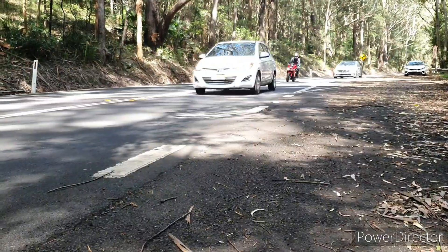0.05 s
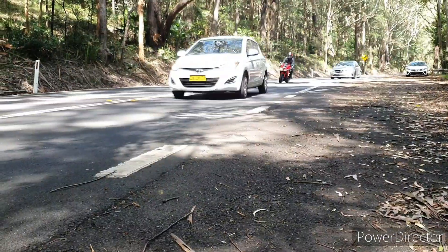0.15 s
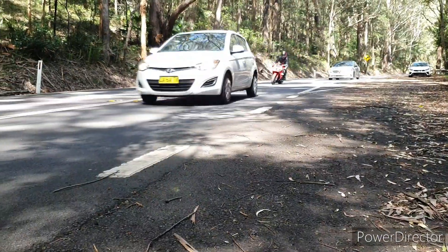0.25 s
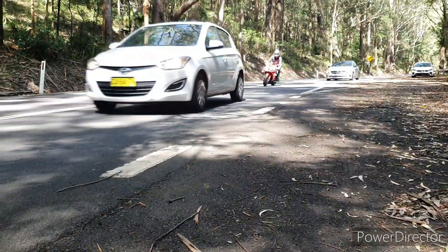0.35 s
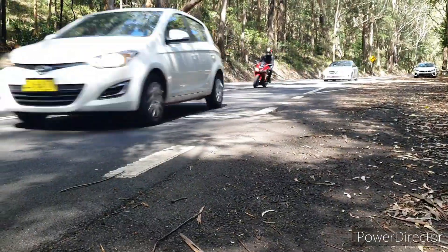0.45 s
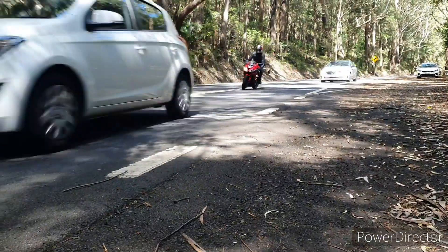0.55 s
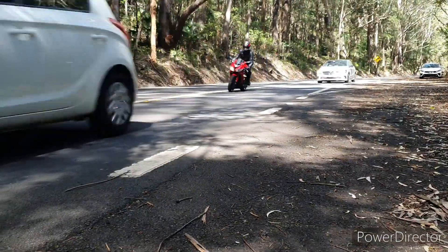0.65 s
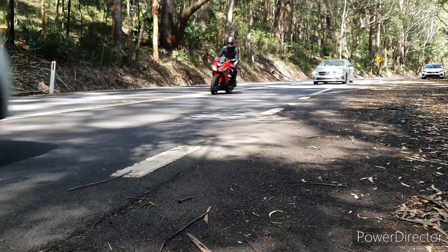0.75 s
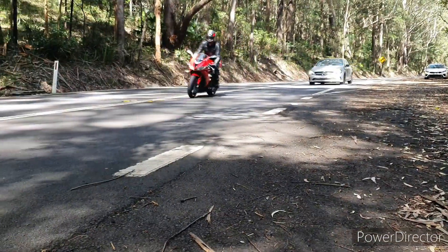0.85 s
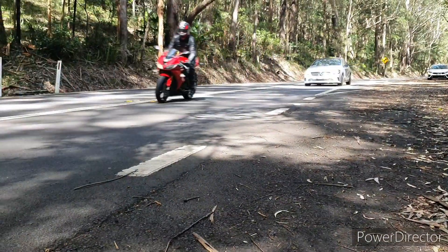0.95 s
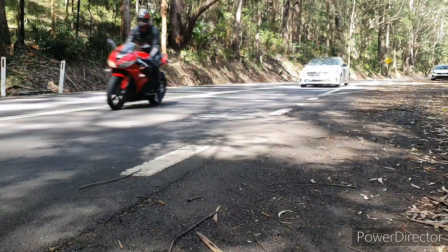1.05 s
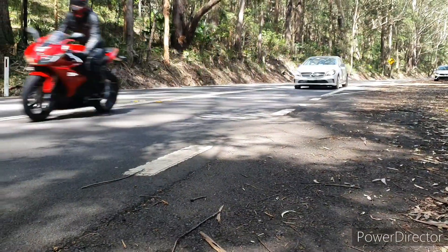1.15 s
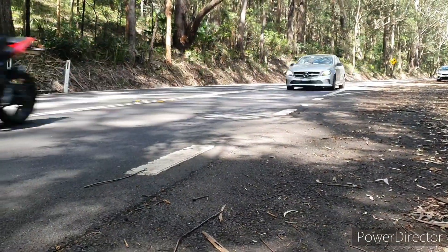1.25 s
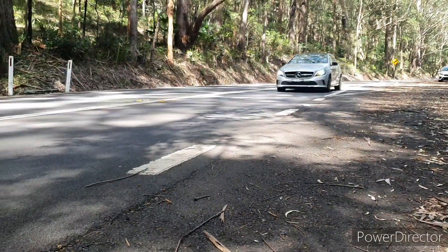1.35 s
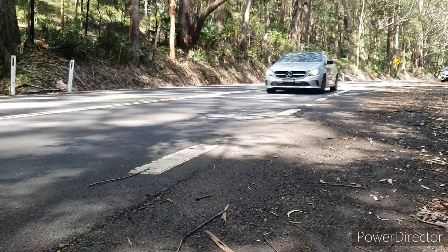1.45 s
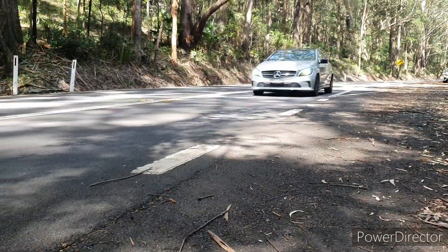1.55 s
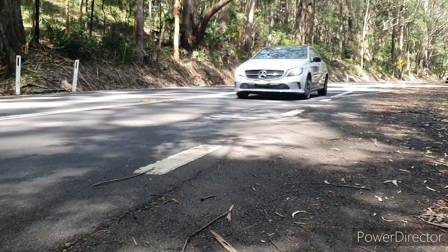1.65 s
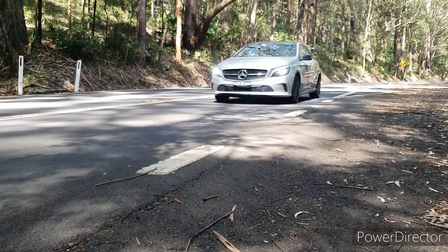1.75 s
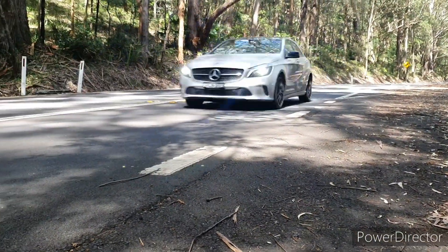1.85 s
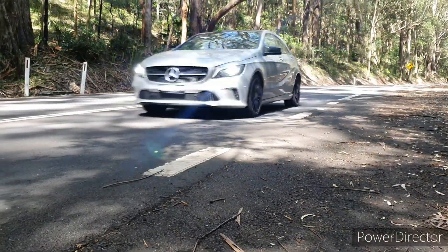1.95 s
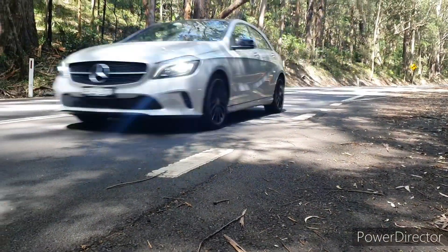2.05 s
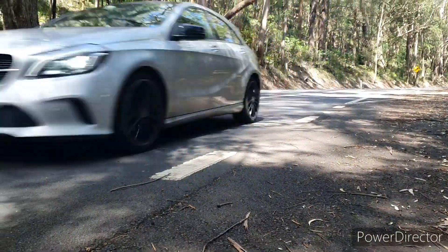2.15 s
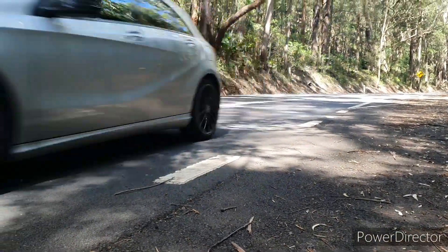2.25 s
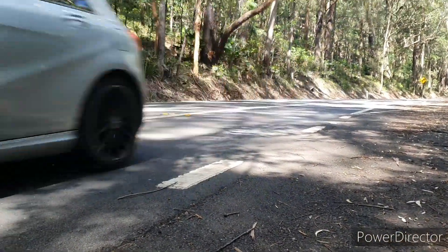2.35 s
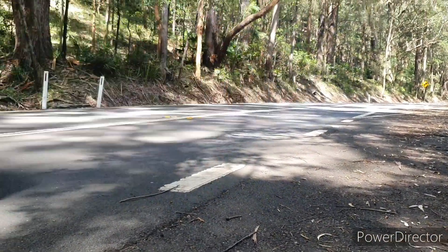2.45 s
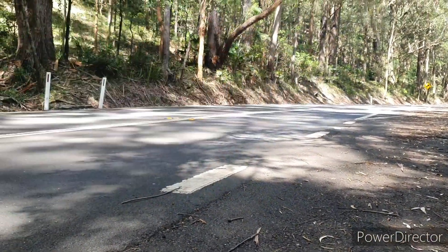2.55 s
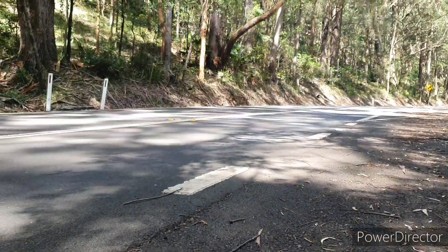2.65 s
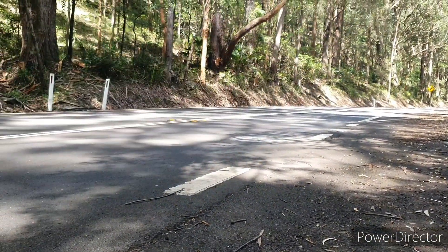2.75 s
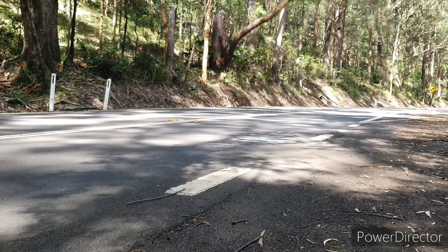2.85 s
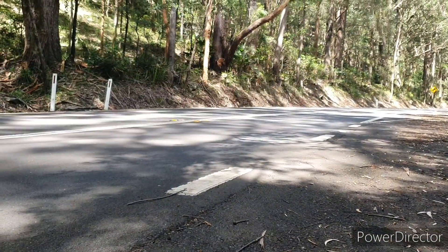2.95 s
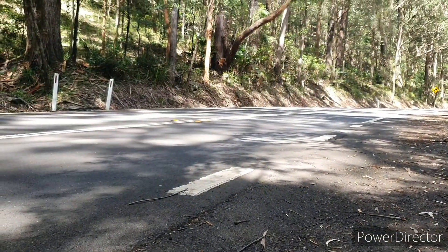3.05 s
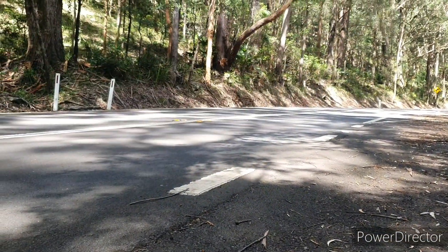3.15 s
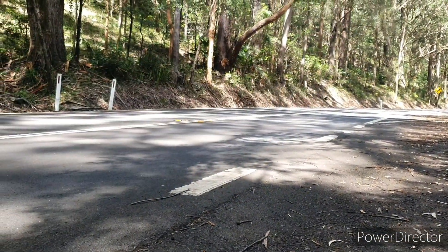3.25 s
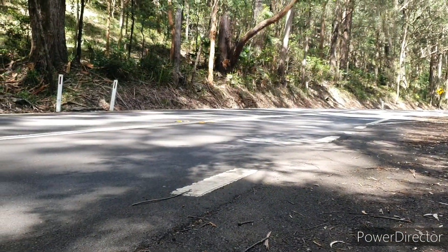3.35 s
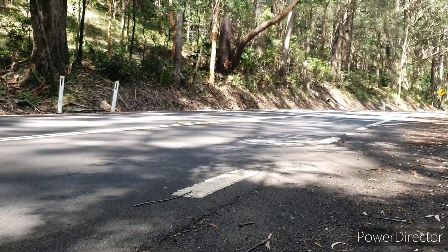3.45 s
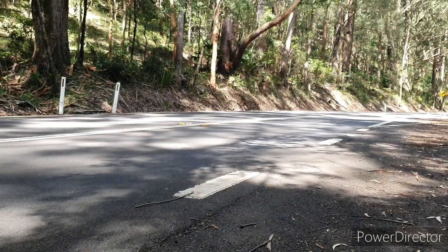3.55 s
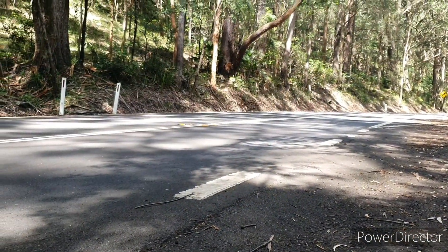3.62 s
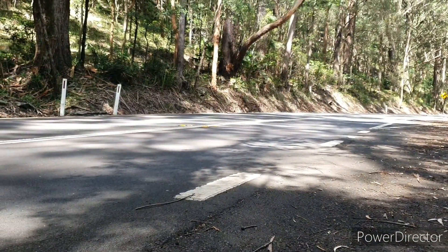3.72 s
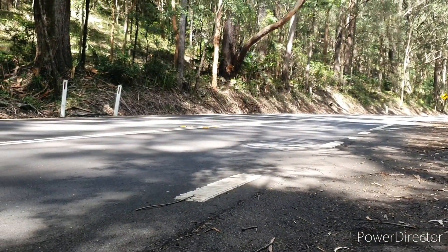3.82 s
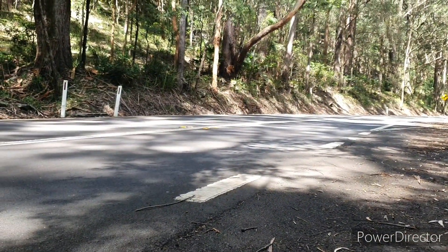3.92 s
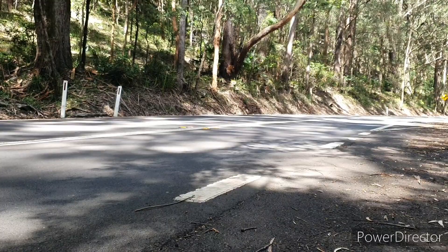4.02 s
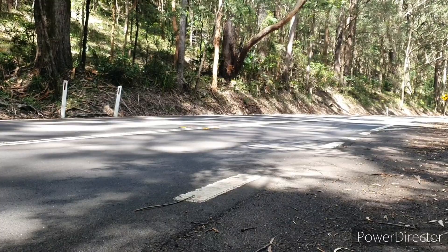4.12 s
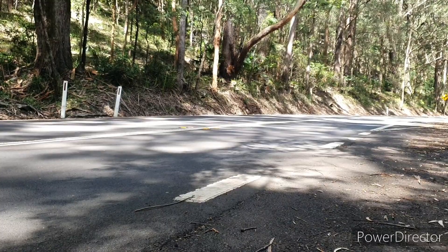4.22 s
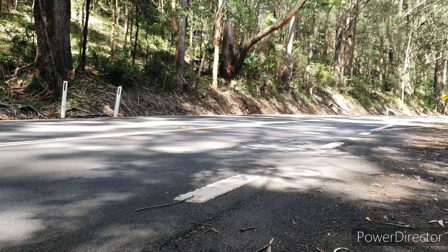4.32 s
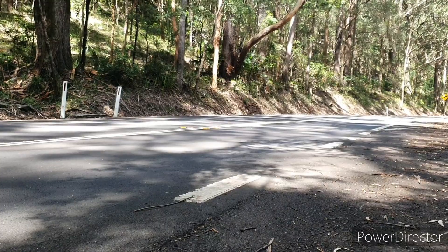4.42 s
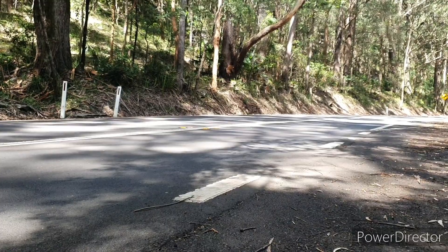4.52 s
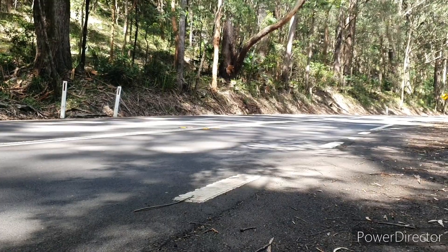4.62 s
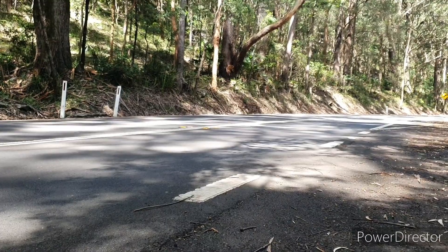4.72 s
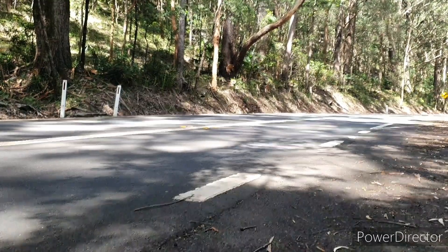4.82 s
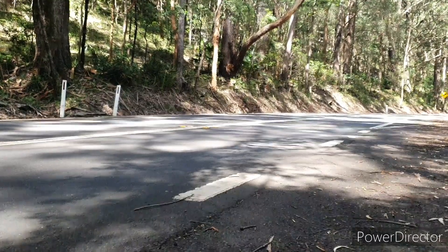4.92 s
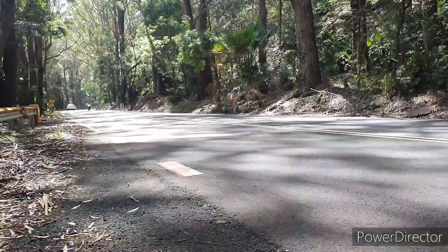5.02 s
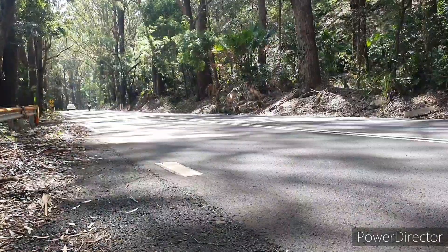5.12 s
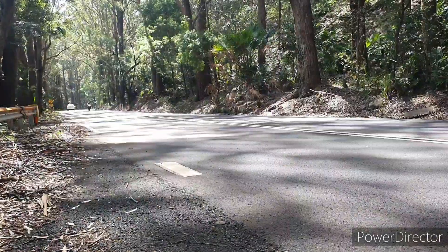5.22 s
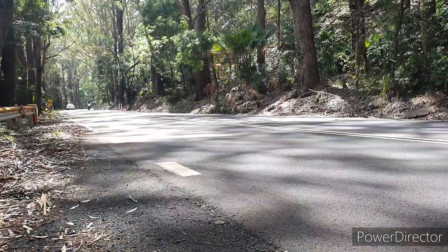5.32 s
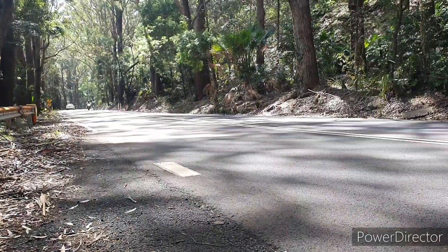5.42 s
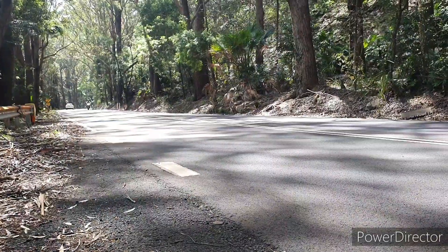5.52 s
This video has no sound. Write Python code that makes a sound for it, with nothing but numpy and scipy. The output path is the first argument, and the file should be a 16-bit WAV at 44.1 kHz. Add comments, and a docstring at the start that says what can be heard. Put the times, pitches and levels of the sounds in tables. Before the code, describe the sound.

A car, a motorcycle and another car sweep past a roadside microphone in quick succession, moving towards the left. The cars are mostly tyre roar and low hum. The motorcycle booms softly and hisses, stumbles with a few pops, then catches and accelerates away with a climbing snarl scattered by the trees. The throttle shuts, the sound cuts out for an instant, and a more distant motorcycle chugs steadily over faint road noise.

```python
"""Motorcycles on a forest road

A three-cylinder motorcycle coasts by between two cars, pops, catches, pulls away, then shuts off.
Firings ring its silencer; chain, intake and tailpipe hiss; tyre treads roar and car engines hum.
Each vehicle sweeps past a microphone pair on the verge, and the trees scatter the sound.
After a short silence, another motorcycle thumps at low revs further off."""
import sys
import numpy as np
from scipy import signal
from scipy.fft import rfft, irfft
from scipy.io import wavfile
from scipy.ndimage import uniform_filter1d, map_coordinates

SR = 44100
rng = np.random.default_rng(int(sys.argv[2]) if len(sys.argv) > 2 else 0)


def generate_wav(sig):
    """Save sig (samples, or channels by samples) to the path in sys.argv[1] as 16-bit PCM at SR."""
    pcm = np.round(np.clip(np.atleast_2d(sig).T, -1, 1) * 32767).astype(np.int16)
    wavfile.write(sys.argv[1], SR, pcm)


N = 246078
T = np.arange(N) / SR

# First car, motorcycle, second car. Each row: passing time in seconds, spread (distance over speed)
# in seconds, tyre gain in dB.
PASSES = [(.76, 0.07, -25), (1.568, 0.17, -39.5), (2.36, 0.058, -33)]
# Tread roar, coming and going. Each row: frequency in Hz, gain in dB.
TYRES_COMING_DB = [(20, -31), (45, -4.5), (80, -1), (200, 0.5), (400, -2.5), (700, -5), (1000, -2.5),
                   (1500, -1.5), (2200, -8.5), (3200, -17), (6000, -33), (15000, -33)]
TYRES_GOING_DB = [(20, -15.5), (45, 0), (80, 10.5), (200, 4), (400, 6), (650, 7.5), (950, 3.5), (1400, -1),
                  (2200, -3.5), (3200, -15.5), (6000, -23.5), (15000, -48)]
# Echo decay. Each row: frequency in Hz, time to fall 60 dB in seconds.
FOREST_T60_S = [(100, 1), (500, 0.82), (2000, 0.69), (12000, 0.15)]
# Each row: start and end in seconds, firing rate before Doppler in Hz, hum in dB, tailpipe swell in dB,
# unsteadiness as a fraction.
CAR_ENGINES = [(0, 1.49, 73.7, -26.5, -19, 0.2), (1.9, 4.95, 58.2, -45, -35.5, .13)]
# Motorcycle engine speed. Each row: time in seconds, base firing rate in Hz.
FIRING_HZ = [(0, 150.5), (.3, 148.5), (.8, 140.5), (1.35, 133.5), (1.6, 126), (1.8, 121), (2.2, 126.5),
             (2.45, 132.5), (2.8, 143), (3.13, 150), (3.85, 168), (4.2, 176), (4.55, 181.5), (4.99, 175)]
# Drive slack jolts the speed. Each row: time in seconds, firing rate jump in Hz, build-up in seconds.
DRIVE_JOLTS = [(1.99, 9.5, 0.057), (3.07, 7, 0.023), (4.7, -8.5, 0.034)]
# Throttle shut. Each row: start and end in seconds, boom in dB, its drift in dB/s, overtones in dB,
# their drift in dB/s, their mid-coast arch in dB.
COASTS = [(0, 1.638, -13, 5, -30, 8.5, 3.5), (4.662, 4.987, -15.5, -11, -22, 7, 0)]
# Silencer with throttle shut, after a lone firing, and under load; then tailpipe snarl.
# Each row: frequency in Hz, gain in dB.
SILENCER_SHUT_DB = [(60, -48.5), (180, -18.5), (255, 5), (350, 1), (385, -8.5), (415, -5), (540, -14),
                    (680, -23), (850, -30.5), (3000, -45), (9000, -82)]
SILENCER_LONE_DB = [(35, -49), (62, -7.5), (90, 9.5), (122, -8.5), (155, -22.5), (183, -4), (212, -1.5),
                    (245, 0), (280, -7.5), (370, -9.5), (490, -12), (600, -25.5), (1200, -52), (9000, -94)]
SILENCER_OPEN_DB = [(40, -43), (125, -9), (140, -11), (150, 0.5), (160, 1.5), (180, -5), (250, 6.5),
                    (300, 1.5), (380, 1.5), (430, 5.5), (545, -4), (595, -2.5), (640, -23.5), (730, -15.5),
                    (930, -41), (1400, -45.5), (2400, -61), (9000, -80)]
SNARL_DB = [(500, -60), (900, -18), (1080, -8), (1200, 2.5), (1260, -3.5), (1400, -18.5), (1650, -9.5),
            (1900, -10), (2300, -29.5), (6000, -73.5)]
# Running gear hiss and tailpipe gas rush. Each row: frequency in Hz, gain in dB.
RASP_COMING_DB = [(900, -16.5), (1500, -8), (2100, 1.5), (2600, -1.5), (3100, -2.5), (3500, -1.5),
                  (4100, -1), (4800, -5), (5600, -7.5), (7200, -14), (10000, -28)]
RASP_GOING_DB = [(700, -7.5), (1100, -1.5), (1450, -3), (1800, 1.5), (2300, -4.5), (2800, -2), (3400, -2.5),
                 (4050, 0), (4800, -6.5), (5600, -6), (7200, -17.5), (10000, -26)]
FIZZ_NEAR_DB = [(4000, -22), (6200, -3.5), (7300, -10.5), (8500, -5), (11000, -5.5), (15500, -7)]
FIZZ_FAR_DB = [(4000, -20.5), (6200, -11), (7300, -3.5), (8500, 1), (10000, -1), (12000, -9),
               (15500, -26.5)]
CHAIN_DB = [(500, -23), (1300, -18.5), (2050, 0.5), (2600, -7.5), (3400, -8), (8000, -29)]
GAS_RUSH_DB = [(700, -31), (1400, -10), (1850, -13.5), (2300, 6.5), (3000, 10.5), (3600, -8), (4400, -10.5),
               (5500, -6), (7200, -12), (12000, -27)]
# Swells on the approach and with the throttle. Each row: time and width in seconds, base boost in dB.
HISS_SURGES = [(1.09, 0.077, 4), (2.02, 0.24, 4), (3.07, 0.28, 5.5), (4.47, 0.34, 5.5)]
# Metallic flares. Each row: time and spread in seconds, centre pitch in Hz, gain in dB.
RING_FLARES = [(0.879, .18, 4333, -36.5), (1.346, 0.032, 4070, -26.5), (1.6, .07, 3914, -30),
               (2.12, 0.065, 3995, -38)]
# Unburnt fuel firing in the pipe. Each row: time in seconds, gain in dB.
FUEL_POPS = [(1.6228, -2), (1.665, -7), (1.89, -4.5)]
# Each entry: one cylinder's strength in dB.
CYLINDERS_DB = [0.07, -1.9, 0.5]
# Two pushes with a lull between. Each row: time in seconds, effort in dB.
THROTTLE_DB = [(1.89, -4.5), (2.2, -1.2), (2.63, -0.1), (2.9, -1.5), (3.24, -6.5), (3.7, -3.5), (4.34, 2),
               (4.66, -1)]
# Dips as the engine catches. Each row: time in seconds, change of effort in dB.
HICCUPS = [(2.021, -2), (2.105, -4.5)]
# Extra snarl in each push. Each row: start and end in seconds, boost in dB.
SNARL_BOOSTS = [(2.26, 3.08, 4), (3.9, 4.236, 4.5)]
# Slow motorcycle's exhaust. Each row: multiple of the cycle rate, gain in dB.
SLOW_ORDERS_DB = [(1, -49), (2, 5.5), (3, -3.5), (4, -5.5), (5, -1.5), (6, -8.5), (7, -12.5), (8, -5.5),
                  (9, -1), (10, -4.5), (11, -19), (12, -19), (13, -9.5), (14, -7.5), (15, -9), (17, -35),
                  (20, -25), (32, -40), (90, -70), (250, -97)]
# Its gas and distant road noise. Each row: frequency in Hz, gain in dB.
SLOW_AIR_DB = [(30, 3), (150, 11), (600, 2), (1000, 1), (1600, -7), (2800, -14.5), (4500, -18), (5800, -18),
               (7300, -31.5), (9500, -33), (10500, -45), (15000, -49)]

FIRST_CAR, MOTORCYCLE, SECOND_CAR = PASSES
GEAR_PASS_S, GEAR_SPREAD_S = 1.467, .19  # chain and intake pass ahead of the tailpipe
OPEN_S, SHUT_S = 1.892, 4.665  # throttle


def amp(db):
    """Decibels to gain."""
    return 10 ** (np.asarray(db) / 20)


def unit_rms(x):
    """Scales to rms 1."""
    return x / np.sqrt(np.mean(x ** 2) + 1e-20)


def steadied(x, samples=2900):
    """Scales to a running rms of 1."""
    power = uniform_filter1d(uniform_filter1d(x ** 2, samples), samples)
    return x / np.sqrt(abs(power) + 1e-12)


def curve(rows):
    """Interpolates (time, value) rows per sample."""
    return np.interp(T, *np.transpose(rows))


def gate(start_s, end_s, fade_samples=200):
    """1 between two times, with linear fades."""
    return uniform_filter1d(((T >= start_s) & (T <= end_s)) * 1., fade_samples)


def swell(at_s, width_s):
    """Gaussian bump of height 1."""
    return np.exp(-((T - at_s) / width_s) ** 2)


def at_hz(rows, hz):
    """Interpolates on a log-frequency axis."""
    row_hz, values = np.transpose(rows)
    return np.interp(np.log(hz + 1), np.log(row_hz + 1), values)


def coloured(x, spectrum_db, size=8192):
    """Minimum-phase filter: each pulse rings after its blow."""
    log_gain = np.log(amp(at_hz(spectrum_db, abs(np.fft.fftfreq(size, 1 / SR)))))
    response = np.fft.ifft(np.exp(signal.hilbert(log_gain).conj())).real[:size // 2]
    return signal.oaconvolve(x, response)[:N]


def noise(spectrum_db):
    """Shaped noise of rms 1."""
    return unit_rms(coloured(rng.standard_normal(N), spectrum_db))


def wander(hz, size=4096):
    """Random drift of rms 1, up to about the given rate."""
    lowpass = np.exp(-(np.fft.rfftfreq(size, T[-1] / size) / hz) ** 2)
    drift = irfft(rfft(rng.standard_normal(size)) * lowpass)
    return unit_rms(np.interp(T, np.linspace(0, T[-1], size), drift))


def pulses(turns, strength):
    """One click per whole turn, placed between samples."""
    at = np.flatnonzero(np.diff(np.floor(turns)) > 0)
    late = (np.ceil(turns[at]) - turns[at]) / (turns[at + 1] - turns[at])
    out = np.zeros(N)
    out[at], out[at + 1] = strength[at] * (1 - late), strength[at] * late
    return out


def three_paths(x):
    """Three unrelated shifts of one noise, for separate paths."""
    return np.array([np.roll(x, k * N // 3) for k in range(3)])


def nearness_db(pass_s, spread_s):
    """Spreading loss: 0 dB alongside."""
    return -10 * np.log10(1 + ((T - pass_s) / spread_s) ** 2)


def receding(pass_s, spread_s):
    """Line-of-sight speed: -1 coming, +1 going."""
    return (T - pass_s) / np.hypot(T - pass_s, spread_s)


def progress(vehicle):
    """0 far off and coming, 0.5 alongside, 1 long gone."""
    pass_s, spread_s, _ = vehicle
    return .5 + np.arctan((T - pass_s) / spread_s) / np.pi


def side_of(vehicle):
    """Sine of the bearing along the bending road, left positive."""
    return np.sin(np.radians(-15 + 170 * progress(vehicle)))


def placed(x, side, shade_hz=900, lag_samples=20):
    """The far microphone hears the sound later and with less treble."""
    treble = signal.lfilter(*signal.butter(1, shade_hz, "high", fs=SR), x)
    tilt, lead = .5 * side * treble, side * lag_samples / 2
    return np.array([map_coordinates(x + k * tilt, [np.arange(N) + k * lead], order=3, mode="nearest")
                     for k in (1, -1)])


def forest(x, mono_hz=260, echoes_per_s=2000, predelay_s=.012):
    """Trunks scatter sparse echoes; their bass is alike in both channels."""
    taps = rng.standard_normal((2, SR)) * (rng.random((2, SR)) < echoes_per_s / SR)
    hz, age_s, bins = signal.stft(taps * (T[:SR] > predelay_s), SR, nperseg=512)
    coherence = np.exp(-(hz / (2 * mono_hz)) ** 2)[:, None]
    bins[1] = coherence * bins[0] + np.sqrt(1 - coherence ** 2) * bins[1]
    decay = amp(-60 * age_s / at_hz(FOREST_T60_S, hz)[:, None])
    tail = signal.istft(bins * decay, SR, nperseg=512)[1]
    return signal.oaconvolve(x[None], tail / np.linalg.norm(tail[0]), axes=1)[:, :N]


def drop_db(step_db, at_s=1.635, dip_db=-1, dip_s=.11):
    """Hiss and roar step down just after 1.6 s, deeper at first."""
    after = uniform_filter1d((T > at_s) * 1., 3000)
    return after * (step_db + dip_db * np.exp(-np.maximum(T - at_s, 0) / dip_s))


def tyres(coming_db=5, going_db=8, lead_s=.062, flutter_db=1, wet_db=-9):
    """Treads beam their roar forward: it peaks early, then deepens and fades."""
    direct, total = 0, 0
    comings, goings = three_paths(noise(TYRES_COMING_DB)), three_paths(noise(TYRES_GOING_DB))
    for vehicle, coming, going in zip(PASSES, comings, goings):
        pass_s, spread_s, gain_db = vehicle
        gone, near_db = progress(vehicle), nearness_db(pass_s - lead_s, spread_s)
        roar = amp(coming_db + .3 * near_db) * np.sqrt(1 - gone) * coming
        roar += amp(going_db + .52 * near_db) * np.sqrt(gone) * going
        roar *= amp(gain_db + drop_db(-7) + flutter_db * wander(19))
        direct += placed(roar, side_of(vehicle))
        total += roar
    return direct + amp(wet_db) * forest(total)


def car_engine(engine, vehicle, tailpipe_lag_s=.25, swell_s=.11, doppler=.03):
    """An unsteady firing note swells and sinks in pitch as the tailpipe comes into view."""
    start_s, end_s, hz, hum_db, swell_db, unsteady = engine
    tailpipe_s = vehicle[0] + tailpipe_lag_s
    turns = np.cumsum(hz * (1 - doppler * receding(tailpipe_s, swell_s))) / SR
    level = amp(hum_db) * (1 + unsteady * wander(22)) + amp(swell_db) * swell(tailpipe_s, swell_s)
    hum = np.sqrt(2) * np.sin(2 * np.pi * turns) * level
    return placed(hum * gate(start_s, end_s, fade_samples=3000), side_of(vehicle))


def firing_hz(swing_hz=10.1, decay_s=.086):
    """Firing rate, with a damped swing after each jolt of the drive."""
    hz = curve(FIRING_HZ)
    for at_s, jump_hz, build_s in DRIVE_JOLTS:
        before_s, after_s = np.maximum(at_s - T, 0), np.maximum(T - at_s, 0)
        envelope = np.exp(-before_s / build_s - after_s / decay_s)
        hz += jump_hz * envelope * np.cos(2 * np.pi * swing_hz * after_s)
    return hz


def coasting(turns, rough=.34, waver_db=1.67, fade_s=.035):
    """Throttle shut: a soft boom at the firing rate and uneven overtones, wavering more from afar."""
    overtones = steadied(coloured(pulses(turns, 1 + rough * wander(90)), SILENCER_SHUT_DB))
    boom = np.sqrt(2) * np.sin(2 * np.pi * turns)
    out = 0
    for start_s, end_s, boom_db, boom_db_per_s, over_db, over_db_per_s, arch_db in COASTS:
        age_s = np.clip(T - start_s, 0, end_s - start_s)
        arch = np.sin(np.pi * age_s / (end_s - start_s))
        note = amp(boom_db + boom_db_per_s * age_s) * boom
        note += amp(over_db + over_db_per_s * age_s + arch_db * arch) * overtones
        out += note * gate(start_s, end_s, round(fade_s * SR))
    far = 1 - amp(nearness_db(GEAR_PASS_S, GEAR_SPREAD_S))
    return out * amp(waver_db * far ** 2 * wander(36))


def hiss_level_db(base_db, coming_slope, going_slope, step_db, surge_scale):
    """Gear hiss swells to the pass, fades after it, and surges at set times."""
    slope = np.where(T < GEAR_PASS_S, coming_slope, going_slope)
    distance_db = slope * nearness_db(GEAR_PASS_S, GEAR_SPREAD_S)
    surge_db = sum(db * swell(at_s, width_s) for at_s, width_s, db in HISS_SURGES)
    return base_db + distance_db + drop_db(step_db) + surge_scale * surge_db


def load_db(slope=.61, hiccup_s=.012):
    """Exhaust level under load: effort, less distance and hiccups."""
    hiccup_db = sum(db * swell(at_s, hiccup_s) for at_s, db in HICCUPS)
    return curve(THROTTLE_DB) + slope * nearness_db(GEAR_PASS_S, GEAR_SPREAD_S) + hiccup_db


def running_gear(turns, throb=.031, near_s=1., chain_db=-32, gas_db=-36):
    """Chain, intake and tailpipe hiss on three paths; it throbs with the firings, duller from afar."""
    def crossfade(first_db, second_db, share):
        first, second = three_paths(noise(first_db)), three_paths(noise(second_db))
        return np.sqrt(1 - share) * first + np.sqrt(share) * second

    rasp_db = hiss_level_db(-28.5, coming_slope=.5, going_slope=.37, step_db=-9.5, surge_scale=1.14)
    fizz_db = hiss_level_db(-27, coming_slope=1.15, going_slope=1.24, step_db=-5.5, surge_scale=.9)
    near = 1 / (1 + ((T - MOTORCYCLE[0]) / near_s) ** 2)
    hiss = amp(rasp_db) * crossfade(RASP_COMING_DB, RASP_GOING_DB, progress(MOTORCYCLE) ** 2)
    hiss += amp(fizz_db) * crossfade(FIZZ_NEAR_DB, FIZZ_FAR_DB, 1 - near)
    hiss += amp(chain_db + fizz_db - fizz_db.max()) * three_paths(noise(CHAIN_DB))
    hiss += amp(gas_db + load_db()) * gate(OPEN_S, SHUT_S) * three_paths(noise(GAS_RUSH_DB))
    return hiss * (1 + throb * np.cos(2 * np.pi * turns))


def metallic_ring(width_hz=230, slope=1.27, doppler=.033):
    """Narrow noise bands flare and slide down in pitch as they pass."""
    out = 0
    for at_s, spread_s, hz, db in RING_FLARES:
        phase = 2 * np.pi * np.cumsum(hz * (1 - doppler * receding(at_s, spread_s))) / SR
        band = three_paths(wander(width_hz)) * np.cos(phase)
        band += three_paths(wander(width_hz)) * np.sin(phase)
        out += band * amp(db + slope * nearness_db(at_s, spread_s))
    return out * amp(drop_db(-3))


def ground_echo(paths, echo=.51, delay_s=.000453, closest_s=1.62, spread_s=.13, width_s=.3):
    """The road's reflection lags most at closest range, so notches sweep down the hiss and back."""
    delayed = np.arange(N) - delay_s * SR * amp(nearness_db(closest_s, spread_s))
    gain = echo * swell(closest_s, width_s)
    reflections = np.array([np.interp(delayed, np.arange(N), x) for x in paths])
    return (paths + gain * reflections) / np.hypot(1, gain)


def stumbling(turns, start_s=1.62, end_s=1.896, level_db=-12, onset_db=-7, rise_s=.031, rough=.39):
    """Only every second charge fires as the throttle opens; the silencer's burble builds."""
    putts = steadied(coloured(pulses(turns / 2, 1 + rough * wander(60)), SILENCER_LONE_DB))
    gas = amp(-10) * noise(SILENCER_LONE_DB)
    level = amp(level_db + onset_db * np.exp(-np.maximum(T - start_s, 0) / rise_s))
    return (putts + gas) * level * gate(start_s, end_s, fade_samples=600)


def fuel_pops(thump_db=-8):
    """Unburnt fuel pops in the pipe with a low thump."""
    out = 0
    for at_s, db in FUEL_POPS:
        blow = 1. * (np.arange(N) == round(at_s * SR))
        pop, thump = coloured(blow, SILENCER_OPEN_DB), coloured(blow, SILENCER_LONE_DB)
        out += amp(db) * (pop / abs(pop).max() + amp(thump_db) * thump / abs(thump).max())
    return out


def pulling(turns, rough=.068, gas_db=-26, flutter_db=.5, snarl_db=-25, rise_s=.04, fade_s=.072):
    """Under load, uneven cylinders ring the silencer hard; the tailpipe snarls once they run cleanly."""
    firing = np.round(turns).astype(int)
    jitter = 1 + rough * rng.standard_normal(firing.max() + 1)[firing]
    blows = pulses(turns, amp(CYLINDERS_DB)[firing % len(CYLINDERS_DB)] * jitter)
    level_db = load_db()
    drone = steadied(coloured(blows, SILENCER_OPEN_DB)) + amp(gas_db) * noise(SILENCER_OPEN_DB)
    clean = .5 + .5 * np.tanh((T - SNARL_BOOSTS[0][0]) / rise_s)
    boost_db = sum(db * gate(start_s, end_s, round(fade_s * SR) + 1)
                   for start_s, end_s, db in SNARL_BOOSTS)
    snarl = steadied(coloured(blows, SNARL_DB)) * amp(snarl_db + 1.2 * level_db + boost_db) * clean
    return (amp(level_db) * drone + snarl) * amp(flutter_db * wander(25)) * gate(OPEN_S, SHUT_S)


def passing_motorcycle(wet_db=-18, direct_hiss_db=-7, pan_db=2.5, waver=.00303):
    """Exhaust and running gear pass together; the verge scatters most of the hiss."""
    turns = np.cumsum(firing_hz() * (1 + waver * wander(22.5))) / SR
    exhaust = pulling(turns) + coasting(turns) + stumbling(turns) + fuel_pops()
    hiss = ground_echo(running_gear(turns)) + metallic_ring()
    side = side_of(MOTORCYCLE)
    direct = placed(exhaust + amp(direct_hiss_db) * hiss[0], side)
    scatter = hiss[1:] * amp(pan_db * np.array([side, -side]))
    far = abs(2 * progress(MOTORCYCLE) - 1)  # more echo at a distance
    return direct + scatter + forest(far * amp(wet_db) * exhaust)


def slow_motorcycle(cycle_hz=32.15, sync_s=5.0405, thump_db=-20.5, air_db=-36, rough=.04, puff=.28):
    """One thump per engine cycle, each with a puff of gas, over distant road noise."""
    turns = (T - sync_s) * cycle_hz
    pipe_db = [(6.2, -58)] + [(order * cycle_hz, db) for order, db in SLOW_ORDERS_DB]
    thumps = amp(thump_db) * unit_rms(coloured(pulses(turns, 1 + rough * wander(30)), pipe_db))
    puffs = 1 + puff * np.exp(-(turns % 1) / .3)
    air = amp(air_db) * unit_rms(noise(SLOW_AIR_DB) * puffs)
    return placed(thumps + air, side=.27) + forest(amp(-22) * thumps + amp(-6) * air)


def scene(gap_start_s=4.987, gap_end_s=5.026):
    """Three vehicles pass; a short silence; the slow motorcycle."""
    cars = car_engine(CAR_ENGINES[0], FIRST_CAR) + car_engine(CAR_ENGINES[1], SECOND_CAR)
    traffic = (passing_motorcycle() + tyres() + cars) * gate(0, gap_start_s, fade_samples=60)
    return traffic + slow_motorcycle() * gate(gap_end_s, T[-1], fade_samples=8)


def record(dry, knee=.68, cutoff_hz=15500):
    """Rounds peaks above the knee, then low-passes."""
    excess, headroom = np.maximum(abs(dry) - knee, 0), 1 - knee
    rounded = dry - np.sign(dry) * (excess - headroom * np.tanh(excess / headroom))
    lowpass = signal.firwin(511, cutoff_hz, window=("kaiser", 9), fs=SR)
    return signal.oaconvolve(rounded, lowpass[None], "same", axes=1)


dry = scene()
out = record(dry)
generate_wav(out)
```